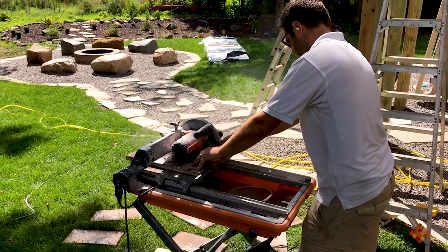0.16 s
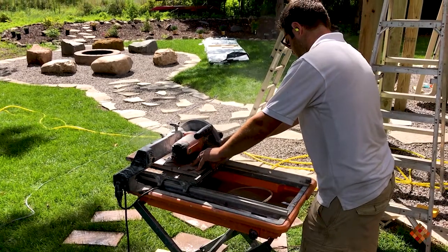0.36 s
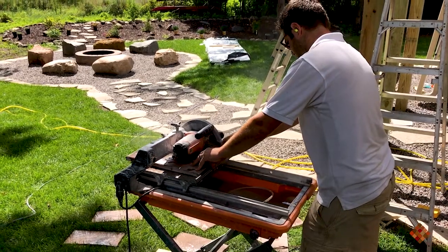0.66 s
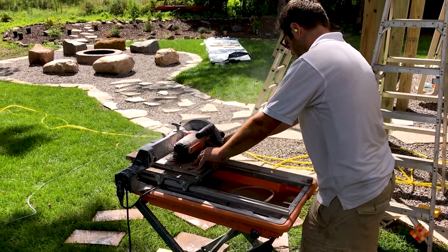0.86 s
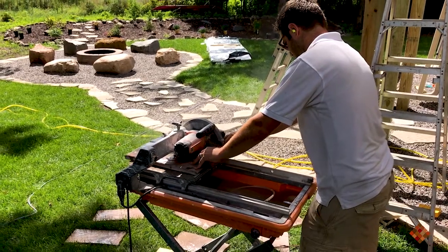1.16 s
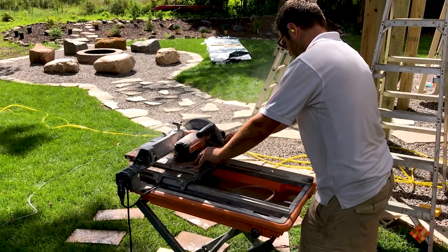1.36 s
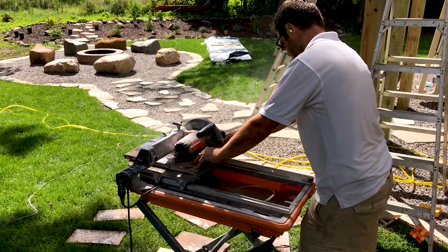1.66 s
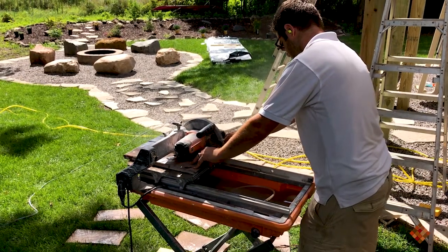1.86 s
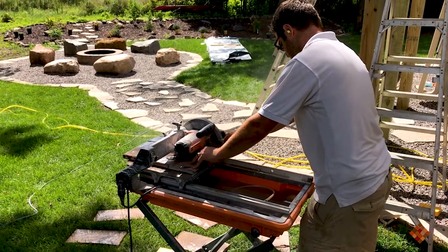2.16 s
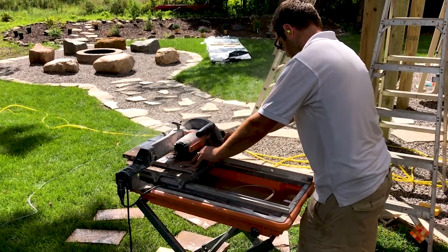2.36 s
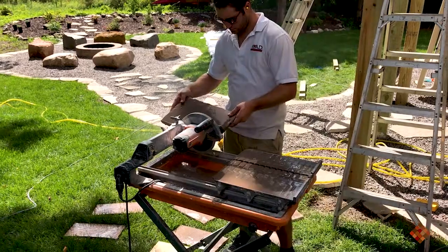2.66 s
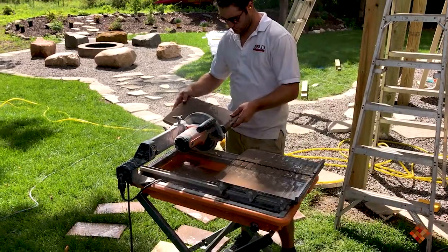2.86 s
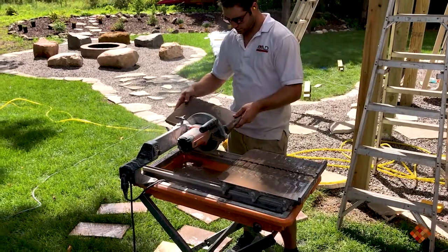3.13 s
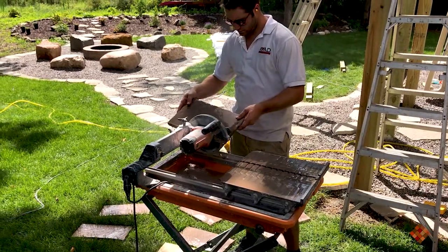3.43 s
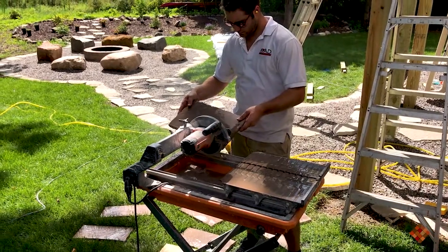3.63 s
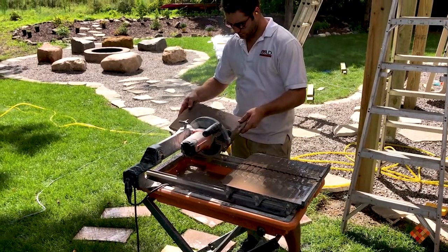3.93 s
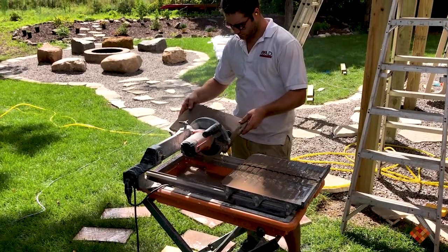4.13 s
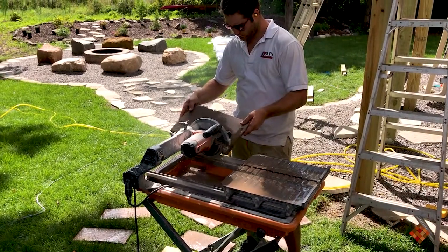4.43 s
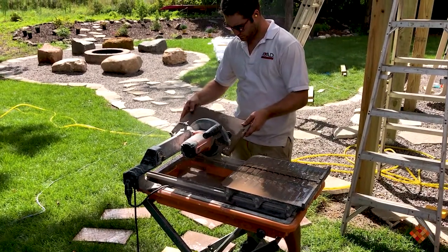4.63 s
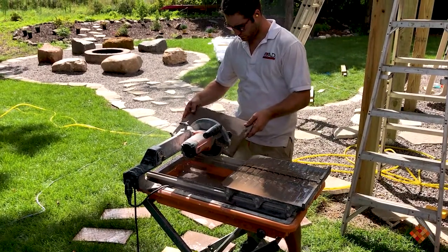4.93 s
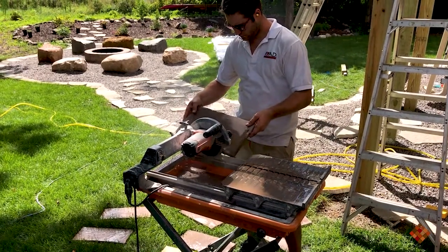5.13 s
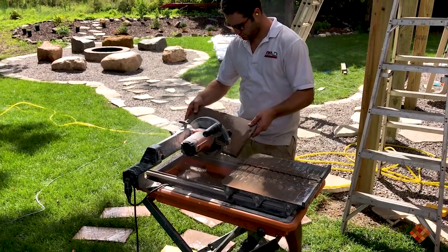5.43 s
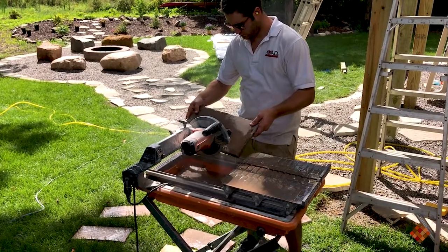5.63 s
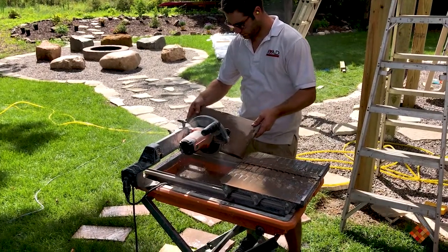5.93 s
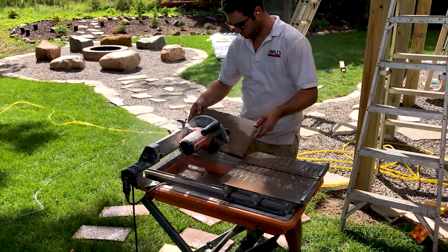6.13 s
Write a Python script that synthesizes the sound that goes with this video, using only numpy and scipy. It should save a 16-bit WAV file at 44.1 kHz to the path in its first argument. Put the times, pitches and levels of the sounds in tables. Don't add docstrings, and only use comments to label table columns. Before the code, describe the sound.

Nonstop harsh grinding of concrete by a spinning diamond blade, nearly mono, dry and open-air at a few metres. The first cut is rough and strained, slowing slightly then speeding up. About two and a half seconds in, it snaps to a louder, freer cut with higher whining tones, looping in half-second bits with dull tile knocks, then eases, bites again and swells until cut off.

```python
import sys
import numpy as np
from scipy import signal
from scipy.fft import rfft, irfft, next_fast_len
from scipy.io import wavfile
from scipy.ndimage import uniform_filter1d

SR = 44100
rng = np.random.default_rng(int(sys.argv[2]) if len(sys.argv) > 2 else 0)


def dump_mix(stems):
    frames = np.atleast_2d(stems).T
    limited = np.clip(frames, -1, 1)
    pcm = np.round(limited * 32767).astype(np.int16)
    wavfile.write(sys.argv[1], SR, pcm)


def voltage_ratio(decibels):
    exponent = np.asarray(decibels, float) / 20
    return 10 ** exponent


N = 277564
T = np.arange(N) / SR

# time in seconds, turns per second.
HARD_SPEED = [
    (0, 81.2),
    (.98, 81.2),
    (1.08, 76.8),
    (1.3, 75.8),
    (1.6, 77.7),
    (1.95, 81),
    (2.3, 84.7),
    (2.55, 87.3),
]
# time in seconds, loudness of the whole cut in dB.
HARD_FEED = [(0, -24.5), (.45, -25), (1.19, -24.5), (1.26, -22.5), (1.38, -23), (1.57, -24.5), (1.78, -23),
             (2.08, -24.5), (2.54, -23.5)]
# share in dB, dB gained per dB of feed, dB gained per dB of splash,
# drift in dB per second as the groove deepens.
HARD_LAYERS = [
    (-7.5, 1.17, -.1, -0.3),
    (-3.5, 1.62, -0.5, 0.26),
    (-6.5, 1.6, 0.44, -0.8),
    (-8.5, 2, 1.94, -1.4),
]
# pitch in Hz, width
# in Hz, level in dB.
HARD_MODES = [(829, 34, -10), (990, 40, -9), (1160, 130, -5), (1450, 60, -9), (1620, 78, -7),
              (2210, 40, -8), (2540, 40, -15), (2680, 51, -15), (2975, 45, -3), (3140, 60, -7),
              (3320, 110, -4), (3560, 60, -4), (3800, 50, -5), (3900, 45, -1.5), (4100, 70, -5),
              (4560, 51, -7), (4870, 170, -11), (5500, 56, -9), (5870, 79, -8), (6420, 60, -14),
              (6600, 72, -11), (6850, 90, -14),
              (7070, 29, -9), (7230, 45, -9), (7500, 46, -14), (7980, 44, -6), (8340, 190, -12),
            (8800, 60, -15), (9010, 54, -11), (9510, 87, -4), (9800, 150, -13), (10150, 200, -17),
            (11050, 60, -12), (11280, 90, -10), (11700, 90, -11), (12100, 120, -14), (12500, 91, -12),
            (12900, 130, -11), (13600, 89, -12), (13900, 120, -16), (14350, 420, -12), (14930, 80, -16),
            (15620, 130, -15)]
# frequency in Hz, level in dB per Hz.
HARD_GRIT = [(260, -62), (450, -15), (900, -6), (1500, -7), (1900, -8.5), (2800, -11), (3600, 1),
             (4150, -8), (4300, -10.5), (9900, -8.5), (10500, -13.5), (11300, -4.5), (14600, -15),
             (15250, -15)]
# multiple of the turn rate, level in dB.
HARD_HUM = [(1, -76), (2, -67), (3, -56.5), (4, -61), (31, -51), (32, -48), (33, -49)]
# grit under the tones in dB, share of roughness that returns each turn (0-1), its memory (0-1),
# throb once a turn in dB, throb twice a turn in dB, scatter of chip sizes in dB, wander of each tone in dB,
# stiffening by spin (exponent).
HARD_FEEL = (-11, .35, .85, 2.2, .9, 1.8, 1.3, .03)


def hard_cut(t):
    return saw(t, HARD_SPEED, HARD_FEED, HARD_LAYERS, HARD_MODES, HARD_GRIT, HARD_HUM, HARD_FEEL)


# time in seconds, turns per second.
LIGHT_SPEED = [
    (4.845, 101.2),
    (5.3, 100.1),
    (5.55, 99.9),
    (5.901, 97.74),
    (6.294, 97.1),
]
# time in seconds, loudness of the whole cut in dB.
LIGHT_FEED = [(4.85, -20.5), (5.04, -23), (5.12, -24.5), (5.31, -23), (5.56, -24.5), (5.62, -27),
              (5.82, -27), (6.11, -24.5), (6.29, -21.5)]
# share in dB, dB gained per dB of feed, dB gained per dB of splash,
# drift in dB per second as the groove deepens.
LIGHT_LAYERS = [
    (-8.5, 0.4, -.1, -0.31),
    (-4, 0.89, 0.081, -0.35),
    (-5.5, 1.36, -0.21, 0.42),
    (-8.5, 1.6, 0.71, .6),
]
# pitch in Hz, width in Hz, level in dB.
LIGHT_MODES = [(1170, 36, -6.5), (1090, 70, -15), (1330, 40, -13), (1688, 26, -9), (2275, 24, -7),
               (2430, 30, -12), (3070, 19, -6), (3130, 25, -8), (3330, 40, -8), (3490, 60, -6.5),
               (3550, 80, -5.5), (3820, 30, -9), (3950, 50, -6), (4060, 25, -10), (4650, 25, -8),
               (4812, 22, -6), (5025, 36, -6), (5600, 19, -10), (5765, 22, -5), (5805, 25, -5),
               (6150, 30, -7.5), (6610, 22, -10), (6765, 30, -7), (6820, 28, -5), (6900, 40, -10),
               (7370, 50, -12), (7570, 30, -14), (7920, 36, -9), (8060, 30, -11), (8170, 25, -10),
             (8290, 30, -11), (8690, 75, -12), (9120, 43, -9), (9350, 40, -9), (9450, 40, -10),
             (9610, 35, -10), (10100, 36, -13), (10370, 45, -12), (10750, 60, -15), (11200, 100, -12),
             (11500, 45, -14), (11750, 72, -8), (12030, 35, -11), (12140, 45, -6), (12420, 30, -13),
             (12700, 60, -10), (13100, 56, -12), (13670, 40, -5), (14100, 40, -11), (14450, 80, -16),
             (14750, 70, -14), (15650, 150, -20)]
# frequency in Hz, level in dB per Hz.
LIGHT_GRIT = [(260, -52), (450, -21.5), (1000, -13), (1300, -9), (2000, -8.5), (3500, -7), (4200, -11.5),
              (4900, -6.5), (5200, -12), (6500, -8.5), (7700, -18), (10500, -19.5), (13000, -12),
              (15400, -18.5)]
# multiple of the turn rate, level in dB.
LIGHT_HUM = [(0.999, -66.5), (2, -71), (2.999, -56.5), (4.549, -64), (5.5, -61.5), (6.002, -58)]
LIGHT_FEEL = (-10, .22, .9, .4, 1.4, 1.8, 1.5, .2)


def light_cut(t):
    return saw(t, LIGHT_SPEED, LIGHT_FEED, LIGHT_LAYERS, LIGHT_MODES, LIGHT_GRIT, LIGHT_HUM, LIGHT_FEEL)


def saw(t, speed, feed, layers, modes, grit, hum, feel):
    grit_db, share, memory, once_db, twice_db, chip_db, wander_db, stiffening = feel
    bite_db, splash_db = surges(t)
    feed_db = np.interp(t, *np.transpose(feed)) + bite_db
    depth = t - t.mean()
    rate = np.interp(t, *np.transpose(speed))
    turns = np.cumsum(rate) / SR
    force = rim(turns, share, memory, once_db, twice_db, chip_db)
    clock = 2 * np.pi * np.cumsum((rate / rate.mean()) ** stiffening) / SR
    blade = blade_ring(force, clock, depth, modes, wander_db)
    loose = colour(force * rng.choice([-1, 1], len(t)), grit)
    bands = split(blade + voltage_ratio(grit_db) * loose)
    cut = balance(bands, layers, feed_db, splash_db, depth)
    return cut + singing(t) + motor(turns, hum)


def rim(turns, share, memory, once_db, twice_db, chip_db):
    share, memory = np.clip([share, memory], 0, .98)
    fresh = rng.standard_normal((400, 512))
    worn = signal.lfilter([np.sqrt(1 - memory ** 2)], [1, -memory], fresh, axis=0)
    bumps = worn[100:].ravel()
    same = bumps[(turns * 512).astype(int)]
    sizes = voltage_ratio(chip_db * rng.exponential(size=len(turns)))
    chips = np.clip(rng.standard_normal(len(turns)) * sizes, -7, 7)
    force = np.sqrt(share) * same + np.sqrt(1 - share) * chips / chips.std()
    throb_db = once_db * np.cos(2 * np.pi * turns) + twice_db * np.cos(4 * np.pi * turns)
    flutter_db = 1.1 * walk(16, len(turns)) + 0.85 * walk(50.07, len(turns))
    return force * voltage_ratio(throb_db + flutter_db)


COVERED_DB_PER_S = {9510: 3, 7070: -1, 7980: -1.5, 11280: 1.2, 11700: 1.2, 12500: -1.5, 12900: -2, 13600:
                    -2, 13900: -2, 14350: -2, 1688: 2.5, 3330: -4, 3490: -2.5, 3550: -2.5, 3950: 2.5, 4060:
                    2, 4812: 1.5, 6150: -1.5, 2540: -2, 2680: -2, 2210: 1.5, 3320: 1, 3560: -1}


def blade_ring(force, clock, depth, modes, wander_db):
    blade = np.zeros(len(force))
    for hz, width_hz, db in modes:
        drive_db = wander_db * walk(9.35, len(force)) + COVERED_DB_PER_S.get(hz, 0) * depth
        blade += voltage_ratio(db) * ring(force * voltage_ratio(drive_db), hz * clock, width_hz)
    return blade


def ring(x, phase, width_hz):
    pole = np.exp(-1.4 * np.pi * width_hz / SR)
    carrier = np.exp(1j * phase)
    smooth = signal.lfilter([(1 - pole) ** 2], [1, -2 * pole, pole ** 2], x * carrier.conj())
    return 2 * (smooth * carrier).real


BAND_EDGES_HZ = [520, 2500, 5300, 10300, 18000]


def split(x):
    size = next_fast_len(len(x))
    hz = np.arange(size // 2 + 1) * SR / size
    lows = [1 / (1 + (hz / edge) ** 12) for edge in BAND_EDGES_HZ]
    return irfft(rfft(x, size) * np.diff(lows, axis=0), size)[:, :len(x)]


def balance(bands, layers, feed_db, splash_db, depth):
    steady = bands / np.sqrt(uniform_filter1d(bands ** 2, SR // 12, axis=1))
    usual_db = feed_db.mean()
    cut = 0
    for band, (db, bite, wet, drift) in zip(steady, layers):
        cut = cut + band * voltage_ratio(usual_db + db + bite * (feed_db - usual_db) + wet * splash_db + drift * depth)
    return cut


# centre in seconds, length in seconds,
# extra bite in dB, extra splash in dB.
SURGES = [(.04, .12, 0.9, -2.5), (0.257, 0.088, 1, 2.5), (0.6, 0.15, 1.5, 0.5), (.86, 0.19, 1, 0),
          (1.07, .16, 1.7, 0), (1.476, 0.14, -0.5, 0.5), (1.8, 0.21, 0, -0.5), (1.992, 0.035, 1.3, -3.5),
          (2.19, 0.1, 1.2, -0.5), (2.328, 0.19, -0.3, 0.5), (2.44, .14, 1, 0.5), (4.915, 0.11, -1, -7),
          (5.186, 0.056, 0.9, 2.5), (5.305, 0.08, .5, 3), (5.49, 0.045, 0.8, 4), (5.717, 0.11, 4.5, .8),
          (5.9, 0.13, 3, -2), (6.128, 0.12, -0.5, 0)]


def surges(t):
    total = np.zeros((2, len(t)))
    for s, length, bite_db, splash_db in SURGES:
        swell = np.exp(-.5 * ((t - s) / (length / 3)) ** 2)
        total += np.outer([bite_db, splash_db], swell)
    return total


# start in seconds, end in seconds, first pitch in Hz, last pitch in Hz,
# level in dB.
SINGING = [(1.22, 1.48, 3885, 3920, -32), (.55, .78, 3815, 3815, -39), (1.95, 2.3, 2205, 2210, -41),
           (2.15, 2.55, 2985, 3010, -39), (2.1, 2.55, 3280, 3340, -39), (4.8, 5.17, 5048, 5022, -35),
           (5.13, 5.42, 5022, 5015, -37), (4.8, 5.3, 1700, 1696, -44), (4.95, 5.45, 4815, 4812, -41),
           (5.22, 5.72, 1700, 1678, -38), (5.75, 6.1, 1675, 1665, -42), (5.25, 5.58, 2285, 2270, -41),
           (4.93, 5.12, 2280, 2278, -42), (5.55, 5.8, 4800, 4790, -40), (2.2, 2.65, 9490, 9520, -38),
           (5.32, 5.5, 3975, 3972, -35), (5.48, 5.78, 3920, 3905, -34), (5.5, 5.75, 3135, 3120, -40),
           (5.44, 5.86, 5025, 5000, -35), (5.86, 6.35, 5000, 4975, -39), (6.13, 6.3, 4055, 4058, -38)]


def singing(t):
    out = np.zeros(len(t))
    for start, stop, from_hz, to_hz, db in SINGING:
        if not t[0] < stop < t[-1] + .1:
            continue
        on = (t > start) & (t < stop)
        along = (t[on] - start) / (stop - start)
        hz = from_hz + (to_hz - from_hz) * along + 4 * walk(22.4, on.sum())
        swell = np.sqrt(np.sin(np.pi * along)) * voltage_ratio(db + 1.5 * walk(27, on.sum()))
        out[on] += np.sqrt(2) * swell * np.sin(2 * np.pi * np.cumsum(hz) / SR)
    return out


def motor(turns, hum):
    tones = sum(voltage_ratio(db + 0.5 * walk(7.6, len(turns))) * np.sin(2 * np.pi * k * turns) for k, db in hum)
    return np.sqrt(2) * tones


# time in seconds, pitch in Hz, time to fall 60 dB in seconds, level in dB.
KNOCK = (4.845, 135, .13, -41)


def knock(t):
    s, hz, t60, db = KNOCK
    age = np.maximum(t - s, 0)
    return voltage_ratio(db - 60 * age / t60) * np.sin(2 * np.pi * hz * age) * (1 - np.exp(-age / 0.0036))


# frequency in Hz, level in dB per Hz.
HARD_TRAY = [(15, -50), (25, -40), (70, -17.5), (130, -23.5), (240, -10), (330, -6), (440, -15.5),
             (600, -4.5), (780, -8), (1320, -99)]
LIGHT_TRAY = [(15, -57), (25, -30), (97, -10.5), (210, -19), (240, -15), (293, -8), (372, -12.5),
              (492, -11.5), (600, -5), (780, -10.5), (1320, -120)]
# time in seconds, level in dB.
HARD_TRAY_DB = [(0, -49.5), (1.2, -47.5), (2.55, -50)]
LIGHT_TRAY_DB = [(4.845, -47.5), (5.421, -49), (5.55, -54), (6.294, -53.5)]


def tray(t, spectrum, curve):
    rumble = colour(rng.standard_normal(len(t)), spectrum)
    level_db = np.interp(t, *np.transpose(curve)) + 1.2 * walk(8.5, len(t))
    return rumble / rumble.std() * voltage_ratio(level_db)


def colour(x, spectrum):
    hz, db = np.transpose(spectrum)
    grid_hz = np.arange(1, 2050) * SR / 4096
    log_gain = np.interp(np.log(grid_hz), np.log(hz), db) * np.log(10) / 20
    cepstrum = irfft(log_gain)
    cepstrum[1:2048] *= 2
    cepstrum[2049:] = 0
    return signal.fftconvolve(x, irfft(np.exp(rfft(cepstrum))))[:len(x)]


def walk(rate, size):
    k = int(SR / rate)
    steps = np.repeat(rng.standard_normal(size // 100), k)[:size + k]
    return 0.85 * uniform_filter1d(uniform_filter1d(steps, k), k)[:size]


# start in seconds, moment of the light cut it plays from in seconds, gain in dB.
EDIT = [
    (2.546, 4.846, 0),
    (3.046, 4.846, -4.9),
    (3.546, 5.046, 0),
    (3.846, 4.846, 0),
    (4.346, 4.846, 0),
    (4.846, 4.846, 0),
]


def scene():
    first, last = round(EDIT[0][0] * SR), round(EDIT[-1][0] * SR)
    out = np.zeros(N)
    out[:first] = hard_cut(T[:first]) + tray(T[:first], HARD_TRAY, HARD_TRAY_DB)
    light_t = T[last:]
    light = light_cut(light_t) + tray(light_t, LIGHT_TRAY, LIGHT_TRAY_DB) + knock(light_t)
    for start, source, db in EDIT:
        piece = light[round(source * SR) - last:]
        out[round(start * SR):][:len(piece)] = voltage_ratio(db) * piece
    return np.array([out, out])


# centre in seconds, low edge in Hz, high edge in Hz,
# level in dB.
SPREADS = [(1.056, 7600, 8950, -38), (1.963, 13100, 14450, -42), (2.868, 9650, 11000, -40),
           (3.633, 10300, 11700, -44), (4.608, 6250, 7550, -35), (4.888, 4250, 5200, -35),
           (4.935, 14500, 15700, -43), (5.517, 6250, 7550, -37)]


def spread():
    side, size = np.zeros(N), 1700
    hz = np.arange(size // 2 + 1) * SR / size
    for s, low_hz, high_hz, db in SPREADS:
        hiss = irfft(rfft(rng.standard_normal(size)) * (hz > low_hz) * (hz < high_hz))
        burst = hiss / hiss.std() * signal.windows.hann(size)
        side[round(s * SR) - size // 2:][:size] += voltage_ratio(db + 0.5) * burst
    return side


def roll_off(x):
    return signal.sosfilt(signal.butter(12, 16310, fs=SR, output="sos"), x)


def record(dry):
    top = signal.ellip(12, .3, 60, 15740, fs=SR, output="sos")
    mix = signal.sosfilt(top, dry + spread() * np.array([[1], [-1]]))
    return roll_off(mix)


dry = scene()
out = record(dry)
dump_mix(out)
```